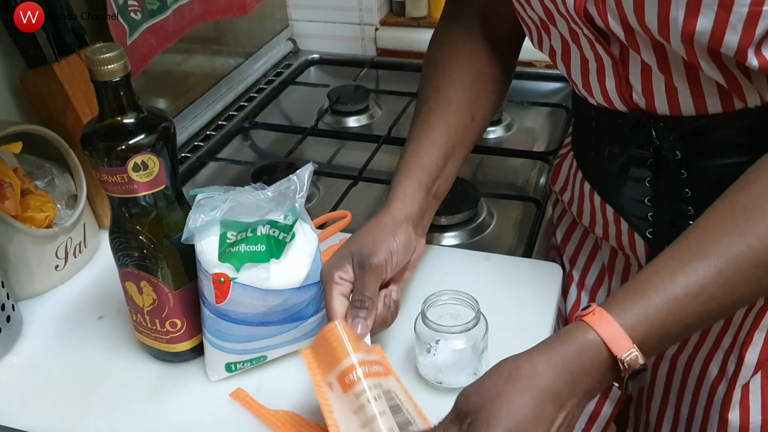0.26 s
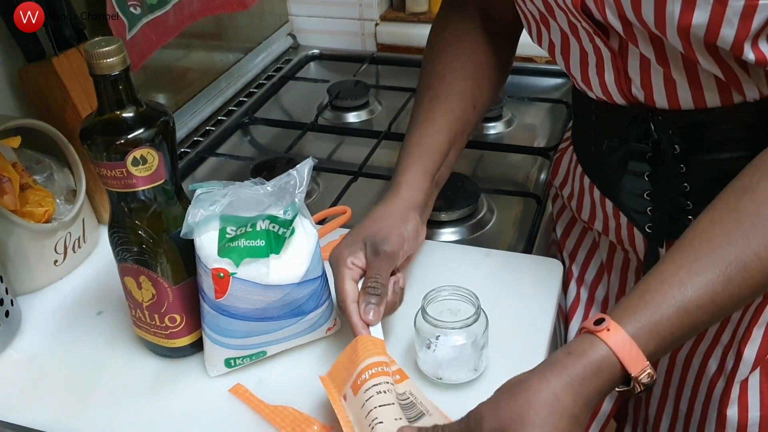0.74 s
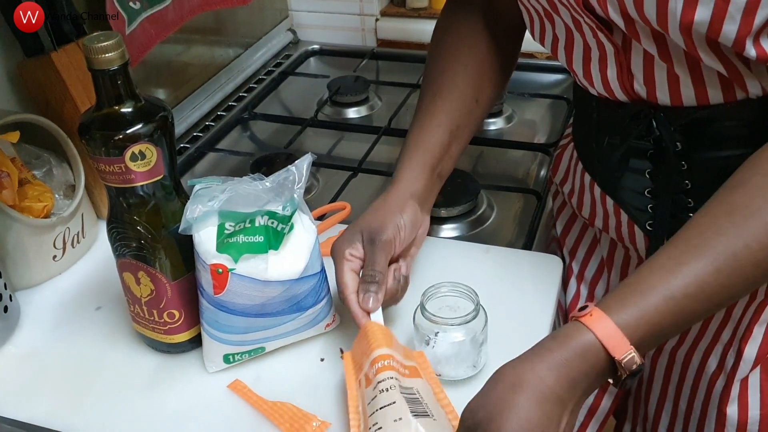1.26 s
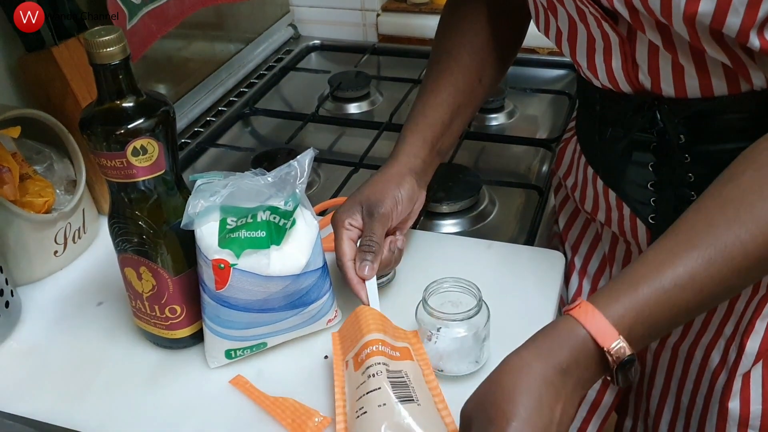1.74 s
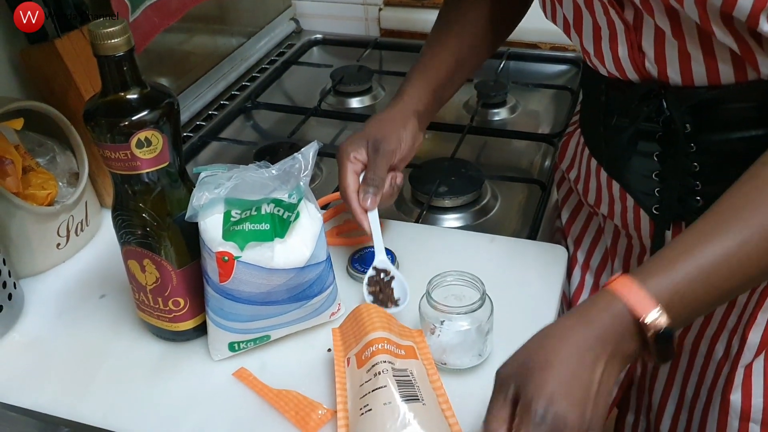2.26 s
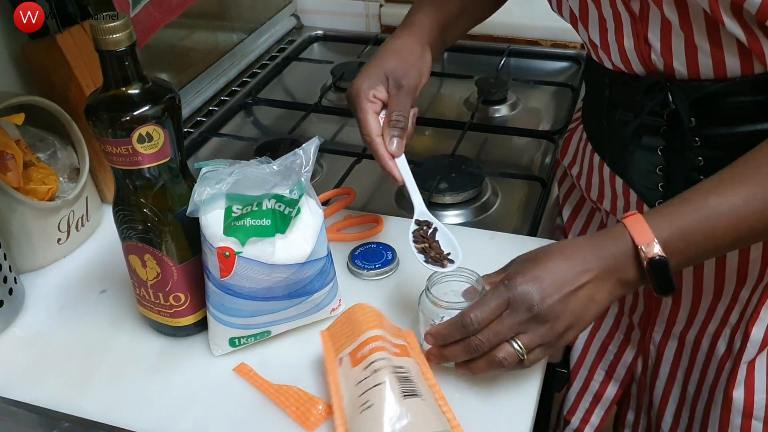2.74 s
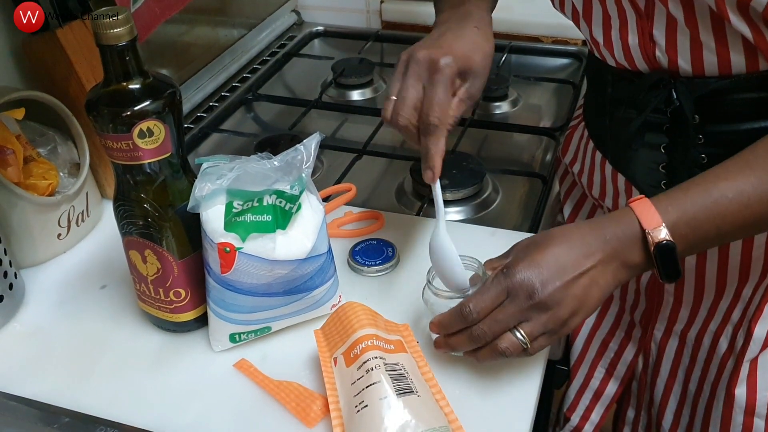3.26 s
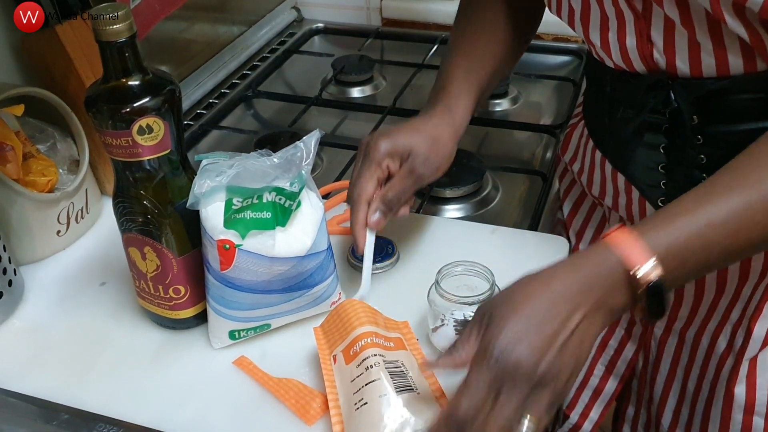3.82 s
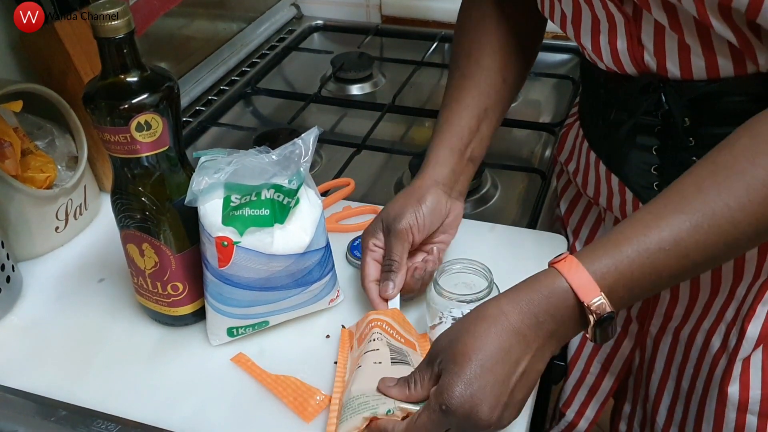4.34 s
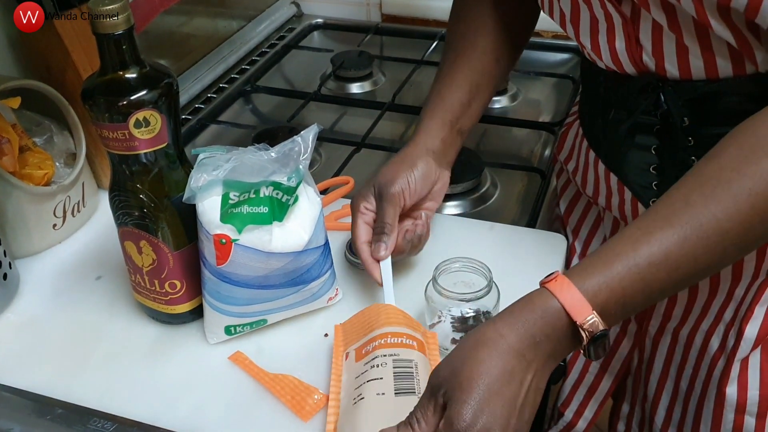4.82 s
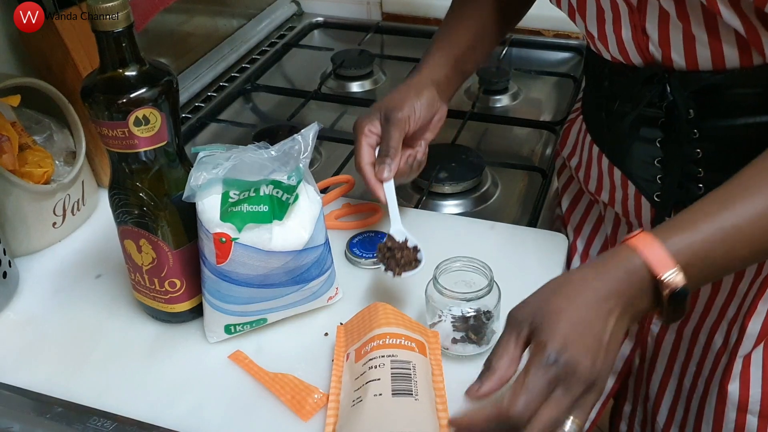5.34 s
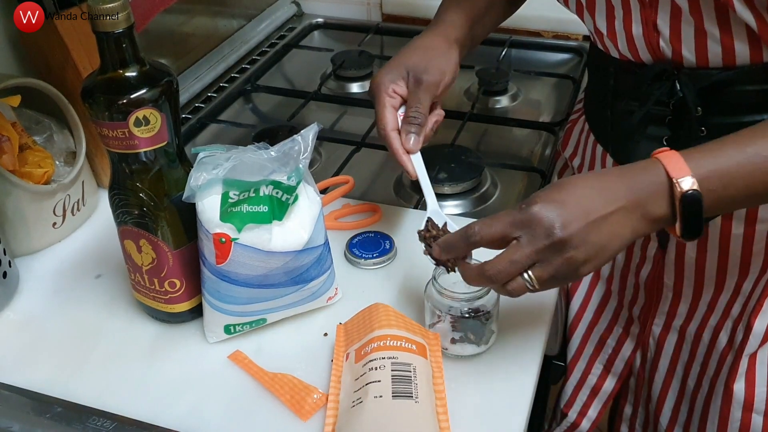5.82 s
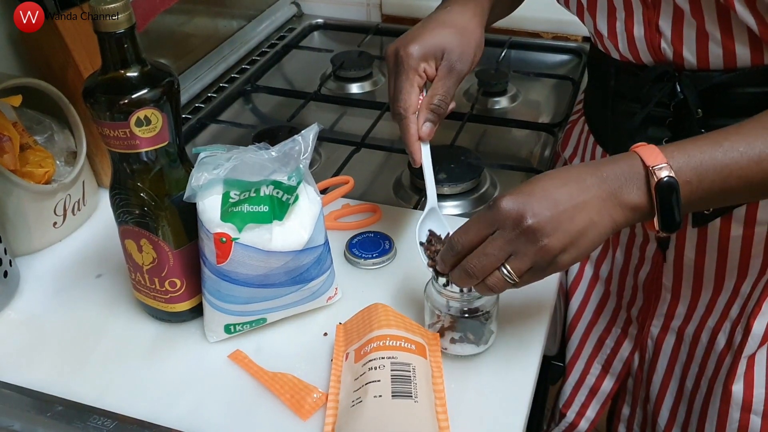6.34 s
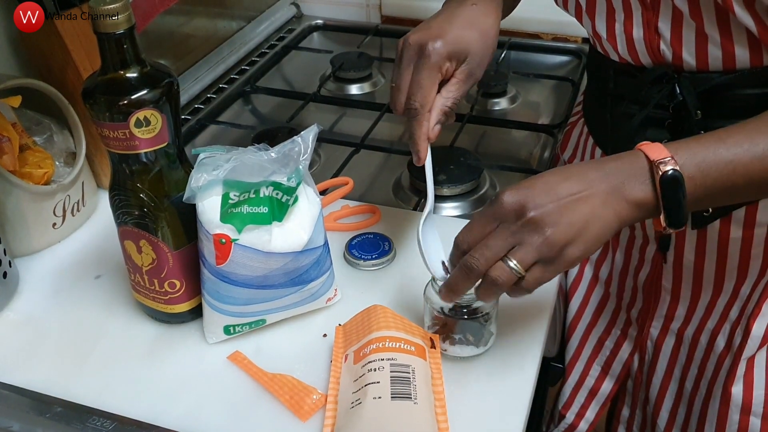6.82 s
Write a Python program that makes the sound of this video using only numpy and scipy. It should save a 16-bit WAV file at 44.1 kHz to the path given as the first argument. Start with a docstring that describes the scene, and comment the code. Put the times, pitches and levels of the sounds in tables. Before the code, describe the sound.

Close stereo pickup of busy crinkling film and clicking dry buds, opened by a loud knock on a glass jar that rings nearby stove metal. The packet goes quiet, the jar is scraped, tapped and nudged with hollow notes and soft board thuds, then more crinkling, a light tap and a few small bud drops. Low fridge hum in a short, bright room.

```python
"""A plastic spoon digs dried cloves out of a crinkling packet and tips them into a small glass jar on a board.
Film and buds are trains of tiny slips and decaying clicks; single snaps are short blows with a ring.
The jar knocks, slides and is tapped: its wall modes ring, and the hollow note of its air sinks while spoon and
hand cover the mouth. Two microphones, the left one nearer, stand in a small hard kitchen that answers every
sound; behind it all, hum lines close in pitch give the fridge a slow beat."""
import sys
import numpy as np
from scipy import signal
from scipy.fft import rfft, irfft, next_fast_len
from scipy.io import wavfile
from scipy.ndimage import uniform_filter1d, map_coordinates

SR = 44100
rng = np.random.default_rng(int(sys.argv[2]) if len(sys.argv) > 2 else 0)


def to_wav(sig):
    """Store sig (one row per channel, or 1-D mono) as 16-bit WAV at the path in sys.argv[1].

    Samples outside -1..1 are clipped; the rate is SR.
    """
    pcm = np.clip(np.atleast_2d(sig), -1, 1) * 32767
    pcm = np.round(pcm).astype(np.int16)
    wavfile.write(sys.argv[1], SR, pcm.T)  # frames by channels


N = 312218
SIZE = 16384  # samples in an impulse response
HZ = np.fft.rfftfreq(SIZE, 1 / SR)
TIME = np.arange(N) / SR


def amp(db):
    """Amplitude ratio of a level in dB."""
    return 10 ** (np.asarray(db) / 20)


def unit(x):
    """Scale to rms 1."""
    return x / np.sqrt(np.mean(x ** 2) + 1e-20)


def along(points, hz):
    """Values at hz, read from (hz, value) points on a log axis."""
    point_hz, value = np.transpose(points)
    return np.interp(np.log(hz + 1), np.log(point_hz + 1), value)


def colour(points):
    """Gain per frequency of a (hz, db) spectrum."""
    return amp(along(points, HZ))


def resonances(modes):
    """Gain per frequency of (hz, width_hz, db) modes, their powers summed."""
    power = 0
    for hz, width, db in modes:
        damping = HZ * width
        power = power + (amp(db) * damping) ** 2 / ((hz * hz - HZ ** 2) ** 2 + damping ** 2)
    return np.sqrt(power)


def causal(gain):
    """Minimum-phase impulse response: it starts at once and has this gain."""
    cepstrum = irfft(np.log(np.maximum(gain, 1e-6)))
    cepstrum[1:SIZE // 2] *= 2
    cepstrum[SIZE // 2 + 1:] = 0
    return irfft(np.exp(rfft(cepstrum)))


def through(x, response):
    """Convolve along time, keeping the length of x."""
    return signal.fftconvolve(np.atleast_2d(x), np.atleast_2d(response), axes=1)[:, :np.shape(x)[-1]]


def add(track, s, sound):
    """Mix a sound into a track at time s."""
    start = max(0, round(s * SR))
    track[:, start:start + sound.shape[1]] += sound[:, :max(0, N - start)]


# likeness of the two microphones in diffuse sound: hz, coherence
MIC_COHERENCE = [(100, 0.68), (250, 0.91), (500, 0.75), (1000, 0.18), (16000, 0)]


def diffuse(size):
    """Stereo noise of sound from all sides: most alike in the low range, unrelated in the treble."""
    coherence = np.clip(along(MIC_COHERENCE, np.fft.rfftfreq(size, 1 / SR)), -1, 1)
    turn = np.arccos(coherence) / 2
    mid, side = irfft(rfft(rng.standard_normal((2, size))) * [np.cos(turn), np.sin(turn)], size)
    return np.array([mid + side, mid - side])


def noise(gain):
    """Steady diffuse noise of rms 1."""
    return unit(through(diffuse(next_fast_len(N + SIZE)), causal(gain))[:, -N:])


# decay of the kitchen: hz, t60_s
KITCHEN_DECAY = [(150, 0.39), (800, 0.22), (2600, 0.25), (6000, 0.28), (14000, 0.1)]


def kitchen(direct_db, room_db, near_t60_s=0.076, lag_ms=.33):
    """Paths to the microphones: direct with its bounce off the worktop, off the bottles, then off the walls."""
    t = np.arange(SIZE) / SR
    hz, frame_s, spectrum = signal.stft(diffuse(SIZE), SR, nperseg=256)
    decay = amp(-60 * frame_s / along(KITCHEN_DECAY, hz)[:, None])
    walls = signal.istft(spectrum * decay, SR, nperseg=256)[1][:, :SIZE]
    walls *= 1 - np.exp(-t / 0.0031)
    near = diffuse(SIZE) * amp(-60 * t / near_t60_s) * (1 - np.exp(-t / 0.0011))
    paths = (unit(near) + amp(room_db) * unit(walls)) / np.sqrt(SIZE)
    direct = rng.standard_normal(SIZE) * np.exp(-t / .0007)
    direct[0] = 3
    direct *= amp(direct_db) / np.linalg.norm(direct)
    lag = round(abs(lag_ms) * SR / 1000)  # the left microphone is the nearer
    return paths + [direct, np.roll(direct, lag)]


def blow(gain, paths, db, pan_db):
    """One contact heard over its paths, its level set over the first fiftieth of a second."""
    sound = through(paths, causal(gain))
    onset_rms = np.sqrt(np.mean(sound[:, :SR // 50] ** 2))
    return sound / onset_rms * amp([[db + pan_db / 2], [db - pan_db / 2]])


def facets(count=4):
    """Each fold of film or clove rings with a few short modes of its own."""
    mode_hz = 600 * 12 ** rng.random(count)
    return np.hypot(.8, resonances([(hz, hz / 9, 2) for hz in mode_hz]))


def grains(envelope, gain, rate, spread_db):
    """Tiny slips of random size, rate a second; their ring and paths change as the hands move."""
    sizes = amp(spread_db * np.minimum(rng.exponential(size=N), 3)) * rng.choice([-1, 1], N)
    slips = sizes * (rng.random(N) < rate / SR)
    # even out the local power so that the envelope sets the level
    slips *= envelope / np.sqrt(np.abs(uniform_filter1d(slips ** 2, size=2200)) + 1e-6)
    out = np.zeros((2, N))
    stretch = SIZE // 6
    for start in range(0, N, stretch):
        part = slips[start:start + stretch]
        if np.abs(part).max() > 1e-4:
            response = through(kitchen(direct_db=4, room_db=-1), causal(gain * facets()))
            response = unit(response) / np.sqrt(SIZE)
            add(out, start / SR, signal.fftconvolve(part[None], response, axes=1))
    return out


def motion(rows, attack_s, release_s, order=2):
    """Gain per sample of hand movements that ease in, hold and die away; order picks the dB column."""
    power = np.zeros(N)
    for row in rows:
        start, length = row[:2]
        t = np.maximum(TIME - start, 0)
        rise = (1 - np.exp(-t / attack_s)) ** 2
        fall = np.exp(-np.maximum(t - length, 0) / release_s)
        power += (amp(row[order]) * rise * fall) ** 2
    return np.sqrt(power)


def wobble(rate):
    """A smooth random curve, rate knots a second."""
    return map_coordinates(rng.standard_normal(400), [TIME * rate], mode="mirror")


# faint drone of the fridge: hz, width_hz, level_db
FRIDGE_DRONE = [(496, 14, -70), (668, 40, -74.5)]
# spectrum of the room air: hz, density_db
ROOM_AIR = [(130, -5.5), (190, -13), (270, -8), (380, -10.5), (520, -13.5), (800, -15.5), (1300, -19.5),
            (2100, -17), (3000, -21), (4500, -27), (6200, -21), (8500, -34.5), (12000, -32), (16000, -37.5)]
# spectrum of the low rumble: hz, density_db
ROOM_RUMBLE = [(20, -21.5), (45, -3), (65, -4), (82, 4), (115, 3.5), (150, -5), (250, -37.5)]


def background(mains_hz=49.975, motor_hz=49.403):
    """Room air and a fridge with a faint drone, whose motor slips behind the mains so that the hum beats."""
    lines = [(2 * mains_hz, -53), (2 * motor_hz, -62.5), (motor_hz, -63)]  # hz, rms level_db
    hum = sum(amp(db) * np.sqrt(2) * np.cos(2 * np.pi * hz * TIME) for hz, db in lines)
    drone = sum(amp(db) * noise(resonances([(hz, width, 0)]) ** 2) for hz, width, db in FRIDGE_DRONE)
    air = amp(-60) * noise(colour(ROOM_AIR))
    rumble = amp(-76) * noise(colour(ROOM_RUMBLE))
    return hum + drone + air + rumble


# fingers brushing over spoon and packet: start_s, level_db (before the swell's own shape)
FINGER_BRUSHES = [(2.062, -58.5), (2.326, -60), (3.517, -62), (5.818, -52)]
# spectrum of skin on plastic: hz, density_db
SKIN_HISS = [(1500, -42), (3800, -24), (4700, 2.5), (7000, -2.5), (9500, -11.5), (15000, -24)]


def fingers(rise_s=0.011):
    """Short soft hisses of skin sliding on plastic."""
    envelope = np.zeros(N)
    for s, db in FINGER_BRUSHES:
        u = np.maximum(TIME - s, 0) / rise_s
        envelope += amp(db) * (1 - np.exp(-u)) * np.exp(-u / 3) * 2
    return envelope * noise(colour(SKIN_HISS))


# dull bumps of the cutting board: start_s, level_db
BOARD_BUMPS = [(0.137, -33), (2.868, -58), (3.427, -42.5), (3.96, -49.5), (4.244, -52), (4.638, -49)]
# modes of the board on its worktop: hz, width_hz, db
BOARD_MODES = [(79, 12, 2), (142.8, 11, 4), (157, 9.6, 2.5), (419, 34, -10)]


def board():
    """The board gives a low thud when jar or hand lands on it."""
    out = np.zeros((2, N))
    thud = resonances(BOARD_MODES) * colour([(170, -3.5), (240, -8), (400, -0.5), (1500, -30.0)])
    for s, db in BOARD_BUMPS:
        add(out, s, blow(thud, kitchen(direct_db=1, room_db=-5.5), db, pan_db=0))
    return out


# the jar sliding on the board: start_s, length_s, relative level_db of its hollow note
JAR_SLIDES = [(2.8, 0.18, -51.5), (3.035, 0.049, -45), (3.11, 0.27, -57), (3.55, 0.059, -44.5)]
# air resonance of the jar as its mouth is shaded: time_s, pitch_hz
MOUTH_PITCH = [(2.93, 942), (3.04, 800), (3.14, 816), (3.3, 926), (3.42, 970)]
SLIDE_ATTACK_S, SLIDE_RELEASE_S = 0.0069, 0.019


def jar_slides(slide_db=-1):
    """The sliding base stirs the air inside: narrow noise carried on the hollow note's moving pitch."""
    phase = 2 * np.pi * np.cumsum(np.interp(TIME, *np.transpose(MOUTH_PITCH))) / SR
    band = colour([(30, -0.5), (80, -13), (300, -36), (1000, -72)])  # offset from the note
    hollow = noise(band) * np.cos(phase) + noise(band) * np.sin(phase)
    return amp(slide_db) * motion(JAR_SLIDES, SLIDE_ATTACK_S, SLIDE_RELEASE_S) * hollow


# the spoon rubbing the rim: start_s, length_s, relative level_db of the glass note
RIM_RUBS = [(2.97, 0.25, -63), (3.27, 0.17, -63), (6.0, 0.47, -72), (6.52, 0.089, -56), (6.98, 0.029, -58)]
# wall modes of the jar: hz, width_hz, db
GLASS_MODES = [(2840, 260, -0.5), (4380, 290, -3), (5764, 58, 5.5), (7400, 560, -16.5), (10100, 300, -20.5),
               (12500, 300, -23.5), (13600, 270, -22)]
RUB_ATTACK_S, RUB_RELEASE_S = 0.011, 0.019


def rim_rubs(rub_db=-1):
    """The rim sings as noise around the strongest wall mode, its level wavering."""
    note = noise(resonances([(GLASS_MODES[2][0], 170, 0)]) ** 2)
    waver = amp(rub_db + 2.3 * wobble(rate=29))
    return waver * motion(RIM_RUBS, RUB_ATTACK_S, RUB_RELEASE_S) * note


# spoon and cloves scraping along the jar: start_s, length_s, relative level_db
JAR_SCRAPES = [(2.7, 0.055, -50.5), (2.745, .11, -49.5), (2.855, .08, -45.5), (2.97, 0.17, -60.5),
               (3.245, 0.036, -50.5), (3.28, 0.046, -44.5), (6.68, .19, -63)]
# spectrum of the scratching: hz, density_db
SCRATCH_SPECTRUM = [(300, -22), (1000, -0.5), (1700, -33), (2800, -11), (3600, -40), (6000, -27),
                    (8800, -46), (10500, -12), (15000, -32)]
# bowl of the spoon: hz, width_hz, db
SPOON_MODES = [(1960, 140, 3.5), (2710, 110, -1), (4400, 140, -0.5), (5720, 100, -7), (7430, 480, -5),
               (9900, 280, -8), (13700, 300, -6)]
SCRAPE_ATTACK_S, SCRAPE_RELEASE_S = 0.0065, 0.014


def jar_scrapes(scrape_db=-1):
    """Spoon and cloves scratch the glass in tiny slips that ring the bowl of the spoon."""
    bowl = resonances(SPOON_MODES) * colour([(7500, 0), (9000, -6)])
    spoon = np.hypot(colour(SCRATCH_SPECTRUM), bowl)
    envelope = motion(JAR_SCRAPES, SCRAPE_ATTACK_S, SCRAPE_RELEASE_S)
    return amp(scrape_db) * grains(envelope, spoon, rate=900, spread_db=4.5)


# knocks and taps on the jar: start_s, level_db, body_db, treble_db, left_right_db, sharpness_db
# (left_right and sharpness are relative)
JAR_TAPS = [(.1329, -15.5, -4, -7.5, -2.5, -2.5), (.177, -24, -0.5, -20, -2, 0.5),
            (2.867, -45.5, -1.5, 8, 1, -7), (2.9317, -31, -3, -0.5, -2, 1.5),
            (3.041, -41.5, 13, 10.5, 1, 0.5), (3.301, -46.5, -6, 10, -2, -15),
            (3.3785, -56.5, -8, 21, -9, 4), (3.4271, -28, 8.5, -36, 0.5, 1.5),
            (3.559, -34.5, 12.5, -56, 1.5, -3), (5.9852, -34, 0.5, -7.5, 2, -2.5),
            (5.992, -42, -10, -1, -9, -2.5), (6.317, -57.5, -1, 32, 5, 0), (6.37, -66, -3, 21, 12, -2)]
# spectrum of the bare contact: hz, density_db
CONTACT_SPECTRUM = [(100, -47.5), (280, -25.5), (450, -17.5), (750, -23.5), (1300, -3), (2000, -1.5),
                    (2900, -8), (4300, -17.5), (6200, -18.5), (8500, -40), (15000, -43)]
# metal of the stove, which rings when the worktop is knocked: hz, relative level_db
STOVE_MODES = [(409, 1), (943, 7.5), (996, 15), (1387, -3.5), (1625, 7), (1890, 4.5), (2224, 1),
               (2318, -4.5), (2499, -5.5), (2803, 2.5), (2978, 8), (3074, -0.5)]


def jar_taps(hollow_db=3, hollow_width_hz=110, stove_db=1, stove_width_hz=11, direct_db=1, shake=0.62,
             click_db=5, crack_db=-8, crack_hz=3800):
    """Each blow rings glass wall and inner air; light ones are brighter, the heaviest also shake the stove."""
    out = np.zeros((2, N))
    heaviest_db = max(row[1] for row in JAR_TAPS)
    for s, db, body_db, treble_db, pan_db, sharp_db in JAR_TAPS:
        lighter_db = heaviest_db - db
        hollow_hz = np.interp(s, *np.transpose(MOUTH_PITCH))
        hollow = resonances([(hollow_hz, hollow_width_hz, hollow_db)]) * colour([(1500, 2.5), (8000, -13.5)])
        stove_gain_db = stove_db - shake * lighter_db
        stove = resonances([(hz, stove_width_hz, mode_db + stove_gain_db) for hz, mode_db in STOVE_MODES])
        glass = resonances(GLASS_MODES)
        jar = np.sqrt(colour(CONTACT_SPECTRUM) ** 2 + glass ** 2 + hollow ** 2 + stove ** 2)
        jar *= colour([(7500, 0.0), (8800, -13), (10000, 1.5)])  # glass radiates little between its upper modes
        top_db = treble_db + click_db * lighter_db / 20
        tilt = colour([(1100, body_db), (2000, 0), (2700, 0), (4600, treble_db), (12000, top_db)])
        paths = kitchen(sharp_db + direct_db, room_db=0)
        add(out, s, blow(jar * tilt, paths, db, pan_db + 1.0))
        # a hard contact also gives a brief crack, weaker in a soft one
        crack = resonances([(crack_hz, 1500, 0)]) ** 2
        crack_level_db = db + crack_db + min(treble_db + 7.5, 0)
        add(out, s, blow(crack, kitchen(direct_db=4.5, room_db=-7.0), crack_level_db, pan_db + 2))
    return out


# cloves landing in the jar: start_s, level_db
CLOVE_DROPS = [(6.616, -48), (6.654, -52), (6.6918, -47), (6.7512, -48.5), (6.803, -55.5), (6.835, -48.5),
               (6.914, -58)]
# spectrum of a snap of film or clove: hz, density_db
SNAP_SPECTRUM = [(100, -17), (300, -16), (550, -1.5), (1000, -0.5), (2000, 0.5), (3000, -3), (4500, -8),
                 (6300, -7.5), (8000, -11.5), (12000, -13.5), (15000, -23)]


def clove_drops(bud_hz=2030, bud_width_hz=200, bud_db=8, direct_db=4.0, pan_db=1):
    """Each falling bud ticks with a short note and a few modes of its own, and faintly rings the glass."""
    out = np.zeros((2, N))
    ring = np.hypot(resonances([(bud_hz, bud_width_hz, bud_db)]), resonances(GLASS_MODES))
    soft = colour([(900, 3.5), (2800, 0.5), (4200, -3.5), (7000, -6), (12000, -3.5)])
    for s, db in CLOVE_DROPS:
        bud = np.hypot(colour(SNAP_SPECTRUM) * facets(), ring) * soft
        add(out, s, blow(bud, kitchen(direct_db, room_db=2), db, pan_db))
    return out


# pushes of the spoon through the cloves in the packet: start_s, length_s, crinkle_db, film_crackle_db
# (both levels relative)
SPOON_STROKES = [(-.03, 0.089, -34, -48), (.07, 0.27, -40, -53.5), (.325, 0.077, -35, -45),
                 (.44, 0.076, -48.5, -56.5), (.515, .11, -40.5, -53), (.705, 0.12, -42, -56),
                 (.83, 0.16, -47, -55.5), (.93, 0.1, -35.5, -43.5), (1.07, 0.18, -40.5, -51),
                 (1.31, 0.068, -44.5, -59.5), (1.47, 0.084, -49.5, -59), (1.72, 0.13, -53.5, -58),
                 (2.035, .04, -57, -68), (3.9, .19, -38.5, -47), (4.08, .16, -38.5, -46),
                 (4.3, .16, -41.5, -49), (4.49, 0.2, -36.5, -54), (4.69, 0.12, -43, -57.5),
                 (4.83, .17, -52.5, -61), (5.075, 0.089, -48.5, -61)]
STROKE_ATTACK_S, STROKE_RELEASE_S = 0.0082, .028


def clove_clicks(click_db=-3, centre_hz=2200, cycles=3.6, spread_db=1.0, count=1500):
    """Hard buds knock together wherever the spoon moves them, each a decaying sine of its own pitch."""
    stirring = motion(SPOON_STROKES, STROKE_ATTACK_S, STROKE_RELEASE_S)
    stirring += motion(JAR_SCRAPES, SCRAPE_ATTACK_S, SCRAPE_RELEASE_S)
    t = np.arange(SR // 40) / SR
    out = np.zeros((1, N))
    for when, pitch, size in rng.random((count, 3)):
        hz = centre_hz * (.02 + pitch) ** .25 / (1.02 - pitch) ** .25
        click = np.sin(2 * np.pi * hz * t) * np.exp(-t * hz / cycles)
        click /= np.linalg.norm(click)
        strength = amp(spread_db * (min(-np.log(1 - size), 3) - 2))
        add(out, when * N / SR, stirring[int(when * N)] * strength * click[None])
    paths = unit(kitchen(direct_db=3, room_db=-1)) / np.sqrt(SIZE)
    return amp(click_db) * np.sqrt(N / count) * through(out, paths)


# the loudest snaps of the packet and of dry cloves on the spoon:
# start_s, level_db, body_db, treble_db, sharpness_db (relative), ring_hz
PACKET_SNAPS = [(.0224, -38, 5, 10, -8, 2300), (.197, -26.5, 4, -2, -9, 2820), (0.4, -36, -19, 0, -6, 1930),
                (0.5753, -31.5, -1.5, -5, 4.5, 3630), (0.6244, -36.5, -4.5, 1.5, -3, 2870),
                (.68, -37.5, -2, -0.5, -16, 1770), (.8214, -35, -3.5, -5, 1, 2930),
                (.832, -30, -2, -3, -4, 1900), (.987, -25.5, -1, 0.5, -2.5, 3000),
                (1.1112, -34, 8.5, -3, 5, 1950), (1.127, -35, -10, 3.5, 2, 1980),
                (1.177, -27, -7.5, 2.5, 1, 4240), (1.217, -37.5, -4, 3.5, 1, 3360),
                (1.3031, -34, 1, -11, 2.5, 2880), (1.319, -36, -18, 8, -1.5, 4860),
                (1.483, -46, 1.5, 2, -4, 4600), (1.502, -44, 6.5, -6, -12, 1230),
                (1.7171, -40.5, 1.5, -6.5, -8, 1080), (1.741, -38.5, 1, -15, 1.5, 1410),
                (1.84, -40.5, 10.5, -2, -5, 2850), (1.8516, -26, -35, 9, 3.5, 3130),
                (2.1718, -41, 5, -14.5, 0.5, 3380), (2.757, -41.5, -19, -6.5, -13, 4450),
                (4.0676, -37, -20, -14, -7, 3100), (4.11, -38.5, 8, 11, -3, 1380),
                (4.152, -31.5, -3, 12.5, 4, 5130), (4.1855, -30.5, -13, 13, 5, 4600),
                (4.219, -29.5, -2, 3, -0.5, 2790), (4.235, -30.5, -1, -48, -7, 1720),
                (4.325, -38, 8, 0, -13, 573), (4.445, -44, -11, 6, 4, 3100),
                (4.516, -31.5, 5, 3, -1.5, 2160), (4.55, -33.5, 12, -1, -10, 545),
                (4.652, -38, 5, -9, -12, 2210), (4.7596, -34, 2, 2.5, 1.5, 5800),
                (4.798, -39, 2, -10, 0, 1640), (4.9336, -32, -13.5, 3, 3, 2710),
                (5.0895, -42.5, 3, -3, -10, 2810), (5.155, -45.5, 7, -23, -5, 1010),
                (5.4698, -37, 3, -7.5, 4, 1270), (6.13, -53.5, 9, 15, -1, 4200),
                (6.239, -47.5, 1.5, -4.5, -10, 1930)]
# spectrum of the crinkling bed: hz, density_db
CRINKLE_SPECTRUM = [(100, -23.5), (300, -9.5), (550, 1), (1000, 3), (2100, 0), (3000, -7), (4500, -6),
                    (6200, -10.5), (8000, -16.5), (15000, -43.5)]
# spectrum of the film's fine crackle: hz, density_db
CRACKLE_SPECTRUM = [(2000, -37), (5000, -8.5), (7000, 1.5), (9000, -6), (12000, -1.5), (16000, -11)]


def packet(crinkle_db=-2, ring_db=5, ring_q=11, direct_db=1, pan_db=1.7):
    """The film buckles in single snaps over a bed of crinkles and shifting cloves."""
    crinkle_motion = motion(SPOON_STROKES, STROKE_ATTACK_S, STROKE_RELEASE_S)
    crackle_motion = motion(SPOON_STROKES, STROKE_ATTACK_S, STROKE_RELEASE_S, order=3)
    crinkle = grains(crinkle_motion, colour(CRINKLE_SPECTRUM), rate=520, spread_db=7)
    crackle = grains(crackle_motion, colour(CRACKLE_SPECTRUM), rate=800, spread_db=6)
    out = amp(crinkle_db) * crinkle + crackle
    for s, db, body_db, treble_db, sharp_db, hz in PACKET_SNAPS:
        tilt = colour([(900, body_db), (1700, 0), (3200, 0), (7000, treble_db)])
        ring = np.hypot(facets(), resonances([(hz, hz / ring_q, ring_db)]))
        paths = kitchen(sharp_db + direct_db, room_db=0)
        add(out, s, blow(colour(SNAP_SPECTRUM) * tilt * ring, paths, db, pan_db))
    return out


def scene():
    """Packet, cloves, jar and board over the hum of the kitchen."""
    jar = jar_slides() + rim_rubs() + jar_scrapes() + jar_taps()
    cloves = clove_drops() + clove_clicks()
    return background() + fingers() + board() + jar + cloves + packet()


# colour of the left microphone against the right: hz, db
MIC_DIFFERENCE = [(100, 2), (550, 0.5), (1100, -1), (2200, -3.5), (4200, -8), (8000, 0), (12500, 2.5)]
TOP_HZ = 16100  # upper limit of the microphones


def record(dry):
    """Two slightly unlike microphones and a steep band limit."""
    size = next_fast_len(N + SIZE)
    hz = np.fft.rfftfreq(size, 1 / SR)
    microphones = amp(np.outer([.5, -.5], along(MIC_DIFFERENCE, hz)))
    band_limit = 1 / (1 + (hz / TOP_HZ) ** 160)
    return irfft(rfft(dry, size) * microphones * band_limit, size)[:, :N]


dry = scene()
out = record(dry)
to_wav(out)
```